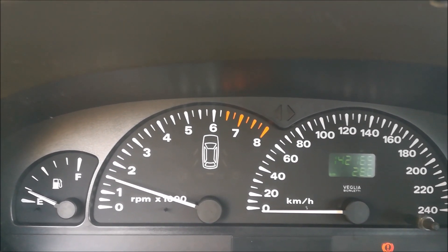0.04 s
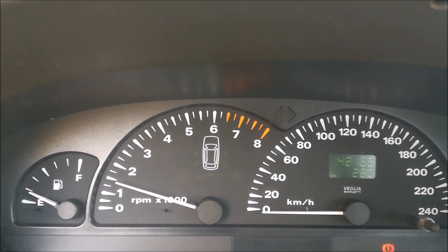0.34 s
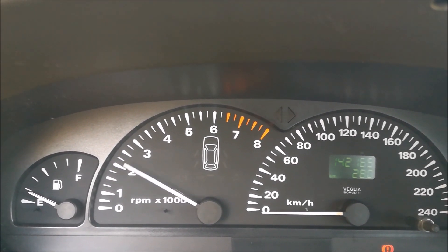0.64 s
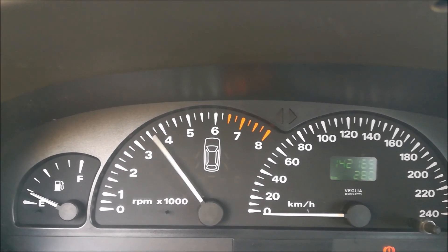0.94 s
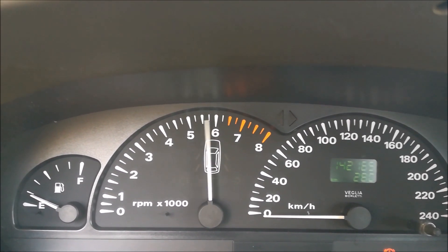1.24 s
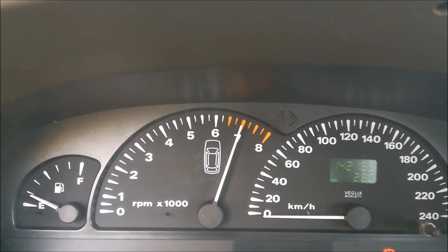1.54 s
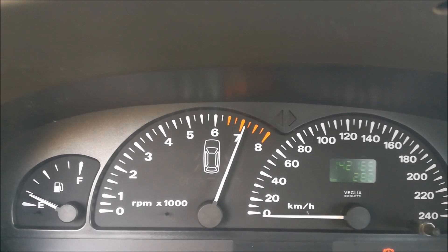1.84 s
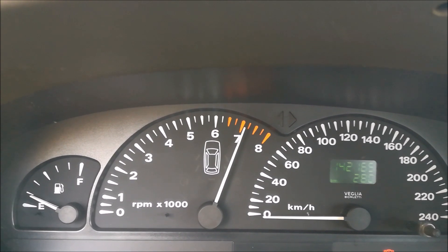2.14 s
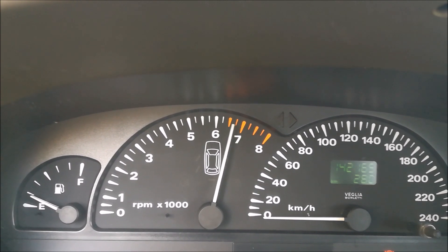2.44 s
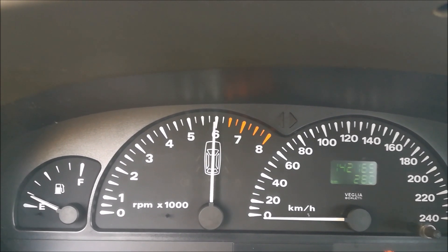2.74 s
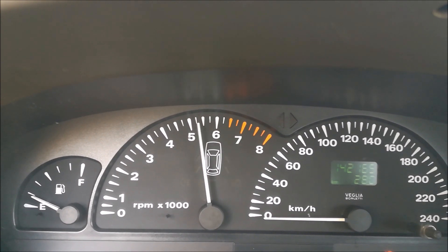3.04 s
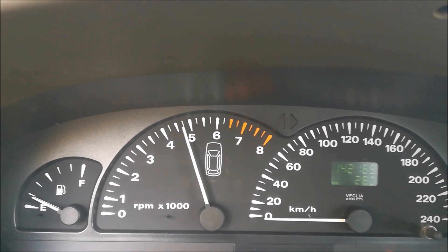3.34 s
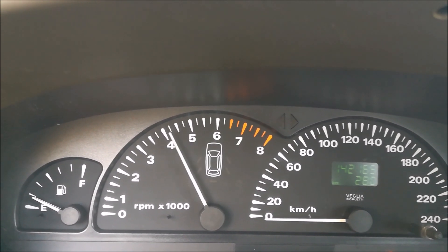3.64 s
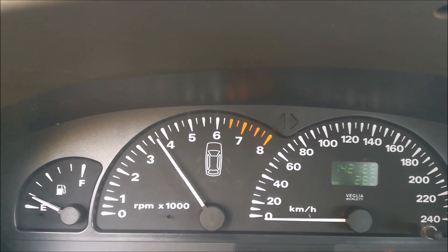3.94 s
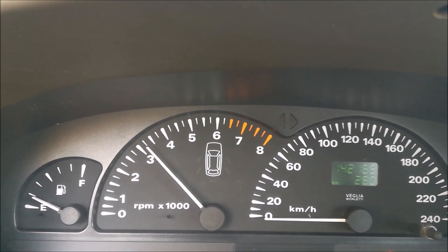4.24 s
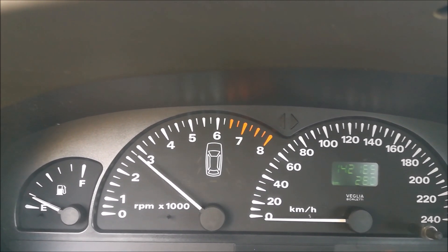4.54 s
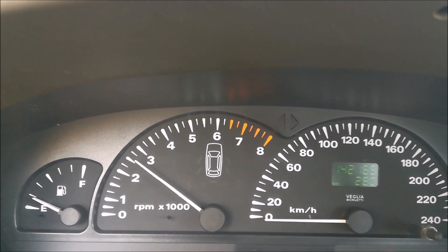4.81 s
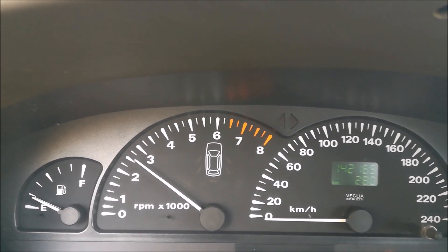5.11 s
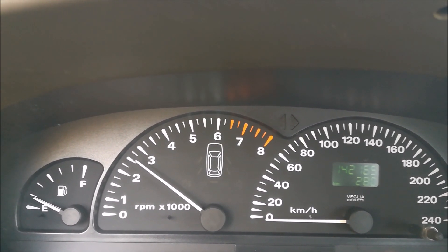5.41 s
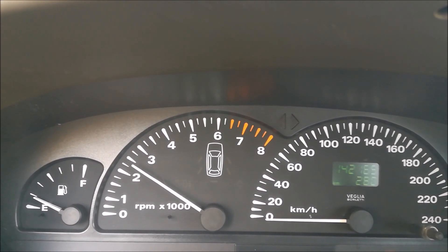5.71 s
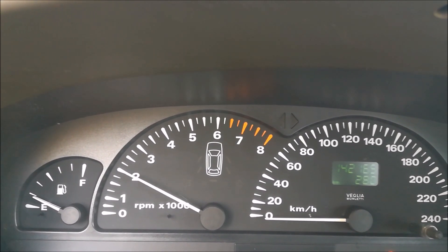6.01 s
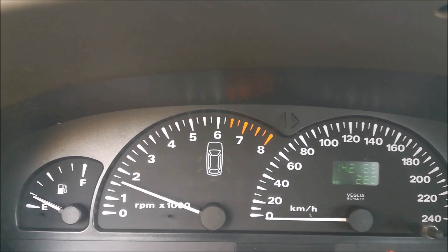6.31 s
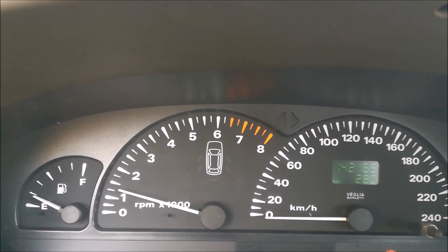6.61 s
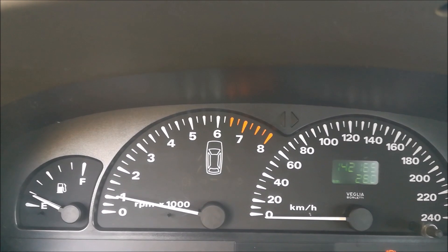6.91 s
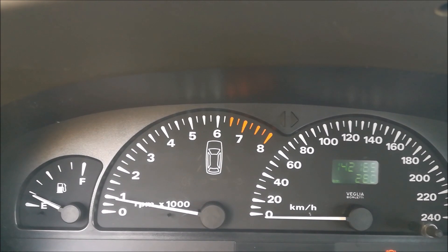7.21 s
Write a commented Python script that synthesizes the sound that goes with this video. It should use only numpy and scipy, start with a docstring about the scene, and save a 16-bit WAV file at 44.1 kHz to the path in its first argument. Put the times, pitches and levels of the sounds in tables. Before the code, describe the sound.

A parked car's engine revs hard, stutters against the limiter, then winds down to a quiet idle, heard from inside.

```python
"""Inside a parked car, stereo microphones at the driver's seat, the engine just beyond the bulkhead. The four-
cylinder is revved up to the limiter, which cuts in eight times a second; then it winds down, with one light
blip, to idle. Engine orders boom in the cabin over the rumble of the exhaust, and combustion and valve-train
noise come through the bulkhead. Far behind: intake, swells of rasp and faint squeaks."""
import sys
import numpy as np
from scipy import signal
from scipy.fft import rfft, irfft
from scipy.io import wavfile
from scipy.ndimage import uniform_filter1d

SR = 44100
rng = np.random.default_rng(int(sys.argv[2]) if len(sys.argv) > 2 else 0)


def log_audio(samples):
    """Write samples as a 16-bit WAV file to the path given in sys.argv[1]."""
    # one column per channel
    frames = np.atleast_2d(samples).T
    # limit to full scale, then quantise
    limited = np.clip(frames, -1, 1)
    pcm = np.round(limited * 32767).astype(np.int16)
    wavfile.write(sys.argv[1], SR, pcm)


N = 328986
TIME = np.arange(N) / SR
BINS = np.fft.rfftfreq(N, 1 / SR)
LIMIT_HZ, IDLE_HZ = 116.4, 17  # crank turns per second


# The engine's tones. Each row: multiple of crank speed, level at the limiter in dB with the throttle
# open, the same with it shut, off-throttle rise in dB per octave of speed.
ENGINE_ORDERS = [(.5, -22.5, -30, 22), (1, -24.5, -30.5, 4.5), (2, -19, -20, 5.5), (2.5, -23.5, -26, 5.5),
                 (3, -35, -32.5, 8.5), (3.5, -37.5, -38, 12), (4, -37.5, -36, 10), (4.5, -34.5, -39.5, 8.5),
                 (5, -34.5, -36, 6), (5.5, -30, -33.5, 13), (6, -33, -29, 18), (7, -32.5, -33, 16.5),
                 (7.5, -35, -34.5, 11), (10, -33, -32.5, 11.5), (12, -27, -35, 30)]
# A belt pulley, same columns.
PULLEY = [(1.15, -27, -22, 11)]
# Peaks and nodes on each order's way to the seat. Each row: order, centre in Hz, width in Hz, lift in dB.
PATHS = [(2, 194, 10, 4.5), (2, 174, 36, -9.6), (2, 136, 12, 2.6), (2, 55.2, 3, 7.4), (2, 36.8, 7.7, 11),
         (2.5, 187, 10, 4.5), (2.5, 284, 23, -7), (3, 216, 17, 10.5), (3, 288, 24, 11.5),
         (3, 341, 24, 13.5), (4, 432, 55, 14.5), (4, 135, 18, 8), (4, 67.5, 25, 16), (5, 293, 22, 10),
         (5, 424, 36, 12.5), (5, 548, 30, 14.5), (5, 210, 45, 5), (6, 545, 42, 12), (7, 401, 22, 11),
         (7, 290, 34, 13.5), (7.5, 475, 23, 10), (10, 1050, 40, 15), (12, 1100, 150, 15.5)]

def engine_tones(turns, speed, throttle, stutter_db, load_db_per_octave=4):
    """Orders swell and fade through the cabin modes; all but the firing tone stutter at the limiter."""
    out = np.zeros((2, N))
    octaves = np.log2(speed / LIMIT_HZ)
    burble = np.sqrt(LIMIT_HZ / speed)  # a slow engine runs less evenly
    for order, open_db, shut_db, slope in ENGINE_ORDERS + PULLEY:
        pitch = order * speed
        gain, lead = cabin(pitch)
        db = shut_db + throttle * (open_db - shut_db)
        db += (slope - load_db_per_octave * throttle) * octaves  # under load, loud even at low speed
        db += sum(lift * peak(pitch, hz, width) for k, hz, width, lift in PATHS if k == order)
        if order == 2:  # the firing tone
            rough = .08
        else:
            rough = .14 * np.sqrt(order) * (1 + throttle) / 2
            db += stutter_db
        out += gain * amp(db) * order_tone(order * turns, lead, rough * burble)
    return out


def order_tone(turns, lead, rough):
    """One order at the two microphones; unequal firings shake its strength and phase."""
    angle = 2 * np.pi * ((turns + rng.random()) % 1)
    phase = np.array([angle + lead / 2, angle - lead / 2])
    shaken = (1 + rough * wander(26)) * np.cos(phase) + rough * wander(11.6) * np.sin(phase)
    return shaken * np.sqrt(2 / (1 + 2 * rough ** 2))


# The rev, up and down. Each row: time in seconds, crank turns per second.
SPEED = [(0.0, 28.5), (0.14, 29.3), (0.32, 37.3), (0.4, 38.5), (0.55, 50.5), (0.81, 72.3), (1.08, 99.2),
         (1.31, 116.9), (2.06, 116.4), (2.87, 87.6), (3.78, 59.2), (4.43, 42), (4.68, 41.5), (4.98, 46.6),
         (5.3, 41.8), (5.92, 29.1), (6.05, 28.6), (6.67, 21.0), (7.0, 18.0), (7.46, 16.1)]
# The pedal: floored, lifted, one light blip. Each row: time in seconds, opening from 0 to 1.
THROTTLE = [(.1, 0), (.35, 1), (2.09, 1), (2.19, 0.3), (4.6, 0), (4.9, 0.13), (5.5, 0)]

def rev(surge, sag=.0043, jitter=.0015):
    """Crank speed and throttle: the flywheel coasts exponentially, sags at each cut and wavers."""
    glide = np.exp(curve([(s, np.log(hz)) for s, hz in SPEED]))
    smooth = uniform_filter1d(glide, size=SR // 14)
    return smooth * (1 - sag * surge + jitter * wander(12)), curve(THROTTLE)


# The limiter's fuel cuts. Each row: time in seconds, relative strength of the surge.
FUEL_CUTS = [(1.3, -1), (1.385, 2), (1.486, 4.5), (1.615, 2.5), (1.739, 4), (1.858, 4.5), (1.977, 3),
             (2.093, 1)]

def limiter(width_s, early_s=0):
    """Each cut jolts the engine: a brief surge about a steady mean."""
    surge = sum(size * np.exp(-((TIME + early_s - s) / width_s) ** 2) for s, size in FUEL_CUTS)
    return surge - uniform_filter1d(surge, size=SR // 4)


# The exhaust, from inside the car. Each row: frequency in Hz, relative level in dB.
RUMBLE_COLOUR = [(12, -30), (29, -7.5), (44, -10.5), (56, -1.5), (66, -11), (85, -17), (130, -20),
                 (300, -66.5)]
# Its course through the rev. Each row: time in seconds, level in dB before the trim.
RUMBLE_LEVEL = [(0.05, -40), (0.5, -39), (0.9, -33.5), (1.35, -23), (2.0, -25), (2.75, -25.5), (3.15, -42),
                (3.65, -37), (4.4, -29), (4.95, -30.5), (5.6, -28), (6.1, -27), (6.35, -33.5), (7.44, -37)]

def exhaust_rumble(jolt, trim_db=-1.5):
    """Deep exhaust noise that lurches with the limiter."""
    return amp(curve(RUMBLE_LEVEL) + trim_db + jolt) * noise(RUMBLE_COLOUR)


# The drone around the seat. Each row: frequency in Hz, relative level in dB.
DRONE_COLOUR = [(70, -22), (135, 2), (200, 0), (290, -2), (400, -8), (600, -8), (710, -21), (1200, -38)]
# Its loudness. In order: dB at the limiter and dB per octave of speed with the throttle open,
# the same two with it shut, dB at idle.
DRONE_LAW = (-24.5, 4, -28.5, 10.5, -50.5)

def gas_drone(speed, throttle, lump_db=.8, modal_share=.17):
    """Gas flow stirs the cabin modes into a slightly lumpy drone."""
    db = loudness(DRONE_LAW, speed, throttle) + lump_db * wander(12)
    cabin_gain, _ = cabin(BINS)
    return amp(db) * noise(DRONE_COLOUR, modal_share * 20 * np.log10(cabin_gain))


# Combustion, from behind the bulkhead. Each row: frequency in Hz, relative level in dB.
ROAR_COLOUR = [(350, -2.5), (720, -4.5), (960, -0.5), (1400, -3.5), (1800, -6), (2200, -11.5), (2700, -6),
               (5000, -17), (9000, -51)]
# Its loudness, laid out like DRONE_LAW.
ROAR_LAW = (-26.5, 15, -30, 17, -56.5)

def combustion(firings, turns, speed, throttle, surge, growl_db=-7):
    """The firings clatter and roar over a growl that gains with speed."""
    roar = clatter(firings, turns, ROAR_COLOUR, knock_share=.18, throb=.01)
    roar += amp(growl_db) * np.sqrt(speed / LIMIT_HZ) * growl(turns)
    return amp(loudness(ROAR_LAW, speed, throttle) + .35 * surge) * roar


def growl(turns, size=2048, half_orders=48):
    """The part of the combustion noise that repeats every two turns: a dense comb of half orders."""
    comb = np.exp(2j * np.pi * rng.random((2, half_orders)))
    comb[:, :half_orders // 4] = 0
    place = np.arange(size) / size
    cycles = np.array([np.interp(turns / 2 % 1, place, cycle) for cycle in irfft(comb, size)])
    return unit(irfft(rfft(cycles) * amp(spectrum(ROAR_COLOUR, BINS)), N))


# The valve train, from behind the bulkhead. Each row: frequency in Hz, relative level in dB.
VALVE_COLOUR = [(1800, -19), (3200, -5.5), (4200, -6.5), (6200, -6), (7500, -4), (9200, -7.5),
                (10400, -11.5), (12000, -10.5), (15500, -22)]
# Its loudness, laid out like DRONE_LAW.
VALVE_LAW = (-31.5, 17, -38.5, 15.5, -65)

def valve_train(taps, turns, speed, throttle, surge):
    """Valves tap and hiss, surging at the fuel cuts."""
    db = loudness(VALVE_LAW, speed, throttle) + 1.02 * surge
    return amp(db) * clatter(taps, turns, VALVE_COLOUR, knock_share=.22, throb=.039)


def knocks(turns, per_turn, uneven_db, chance_db, scatter_s=.0003):
    """A train of blows; their pattern repeats every two turns, with chance in strength and timing."""
    beat = np.floor(turns * per_turn).astype(int)
    at = np.flatnonzero(np.diff(beat)) + 1
    pattern = rng.uniform(-.5, .44, 2 * per_turn)
    chance, late = rng.uniform(-2, 2, (N, 2))[beat[at]].T
    landing = (at + np.round(late * scatter_s * SR).astype(int)) % N
    train = np.zeros(N)
    train[landing] = amp(uneven_db * pattern[beat[at] % len(pattern)] + chance_db * chance)
    return train


# Bulkhead panels ahead of the seat. Each row: centre in Hz, width in Hz, full lift in dB.
PANELS = [(1010, 90, 5.5), (1380, 90, 4.5), (1743, 55, 8), (2190, 240, 13.5)]

def clatter(train, turns, colour, knock_share, throb, idle_ring=.48):
    """Blows and rushing noise that pulses with each firing, both through the bulkhead panels."""
    blows = irfft(rfft(train) * amp(spectrum(colour, BINS)), N)
    blows = unit(reflect(np.array([blows, blows]), t60=.092, wet_db=5))
    rush = unit(noise(colour) * firing_pulse(turns, throb))
    plain = np.sqrt(knock_share) * blows + np.sqrt(1 - knock_share) * rush
    panels_db = sum(db * peak(BINS, hz, width) for hz, width, db in PANELS)
    ringing = irfft(rfft(plain) * (amp(panels_db) - 1), N)
    # the panels ring more as the engine shakes them faster
    pace = np.gradient(turns)
    shaking = np.interp(pace, [pace.min(), pace.max() / 2], [idle_ring, 1])
    return unit(plain + shaking * ringing)


def shudder(turns, speed, mount_hz=30.5, peak_db=-37, rest_db=-52):
    """Uneven firings rock the block and thud through the body, hardest where the mounts resonate."""
    blows = knocks(turns, per_turn=2, uneven_db=3.5, chance_db=4.5)
    thuds = unit(band(blows, hz=198, width=123))
    return amp(rest_db + (peak_db - rest_db) * peak(speed, mount_hz, width=15)) * thuds


def intake(turns, speed, throttle, limit_db=-37, db_per_octave=9):
    """Air rasps past the open throttle, one gulp for each cylinder."""
    gulps = rng.standard_normal((2, N)) * firing_pulse(turns, depth=.5)
    rasp = unit(band(gulps, hz=1150, width=800))
    return throttle * amp(limit_db + db_per_octave * np.log2(speed / LIMIT_HZ)) * rasp


# A low cabin boom as the revs climb, the short low knock under the tick, a soft thump as the engine slows.
# Each row: start in seconds, level in dB, pitch in Hz, seconds to fall 60 dB.
LOW_SOUNDS = [(0.455, -3, 108, 0.42), (4.875, -13, 130, 0.025), (5.945, -19, 180, 0.05)]

def boom_and_knocks():
    """Each is a low tone that rises softly and dies away."""
    out = np.zeros(N)
    for start, db, hz, t60 in LOW_SOUNDS:
        age = np.maximum(TIME - start, 0)
        attack = 1 - np.exp(-10 * age / t60)
        out += amp(db - 60 * age / t60) * attack * np.sin(2 * np.pi * hz * age)
    return out


# Swells of narrow rasp. # Each row: midpoint in seconds, length in seconds, centre in Hz, width in Hz, level in
# dB.
RASP_SWELLS = [(0.357, 1, 980, 200, -56.5), (4.48, 0.27, 1090, 160, -54), (5.05, .6, 1220, 350, -61),
               (7.26, 0.42, 2950, 450, -66)]

def rasp_swells(turns):
    """Swells of narrow rasp that pulse with each firing."""
    out, pulse = np.zeros((2, N)), firing_pulse(turns, depth=.5)
    for middle, length, hz, width, db in RASP_SWELLS:
        swell = np.cos(np.pi * np.clip((TIME - middle) / length, -.5, .5))
        out += amp(db) * swell * unit(pulse * band(rng.standard_normal((2, N)), hz, width))
    return out


# Squeaks that barely reach the seat.
# Each row: midpoint in seconds, length in seconds, top pitch in Hz, level in dB.
SQUEAKS = [(6.048, .04, 9720, -65), (6.126, .03, 9720, -61), (6.43, .03, 5520, -63),
           (6.465, .04, 4000, -65), (6.49, .04, 4750, -66), (6.522, .07, 2800, -62.5),
           (6.555, .05, 4750, -62.5)]

def squeaks(arch=.016, quiver_hz=35, flutter=.45):
    """Faint broken squeaks that arch in pitch."""
    out, quiver = np.zeros(N), quiver_hz * wander(158)
    grip = np.maximum(1 + flutter * wander(70), 0)
    for middle, length, hz, db in SQUEAKS:
        near = abs(TIME - middle) < length / 2
        swell = np.cos(np.pi * (TIME[near] - middle) / length)
        pitch = hz * (1 + arch * (swell - 1)) + quiver[near]
        out[near] += amp(db) * swell * grip[near] * np.sin(2 * np.pi * np.cumsum(pitch) / SR)
    return out


# Thin hiss shared by the idle valve and the dashboard. Each row: frequency in Hz, relative level in dB.
AIR_COLOUR = [(1200, -36), (3500, 9), (7400, 9), (9500, -15), (15500, -19)]

def idle_air_and_tick(open_s=2.5, close_s=6.5, tick_s=4.875, tick_t60=.042):
    """The idle valve hisses as it catches the falling engine; plastic dashboard trim ticks once."""
    opening = np.minimum((TIME - open_s) / 7, (close_s - TIME) / 1.5)
    air = amp(-54) * np.clip(opening, 0, 1)
    tick = (TIME > tick_s) * amp(-49 - 60 * abs(TIME - tick_s) / tick_t60)
    return (air + tick) * noise(AIR_COLOUR)


# The cabin's air modes at the driver's seat.
# Each row: centre in Hz, width in Hz, gain in dB, lead of the left microphone in radians.
CABIN_MODES = [(53, 12, -2, 0.1), (107, 41, -6.5, 0.1), (145.5, 40, -2, 0.23), (206.3, 60, 1.5, 0.25),
               (233, 4.7, 3.5, -0.86), (294.1, 11.5, -0.5, -1), (331.3, 42, 1, -2), (381, 17, 1.5, -1.8),
               (421.2, 18, -1.5, -1.5), (502, 98, -1, -2)]

def cabin(hz, floor_db=-14):
    """Gain and left-right phase of a tone that sweeps through the cabin modes."""
    grid = np.geomspace(5, 4000, 1500)
    modes = sum(amp(db) ** 2 / (1 + 2 * ((grid - f) / width) ** 2) ** 2 for f, width, db, _ in CABIN_MODES)
    gain = np.interp(hz, grid, np.sqrt(amp(floor_db) ** 2 + modes))
    return gain, spectrum([(f, lead) for f, _, _, lead in CABIN_MODES], hz)


def reflect(x, t60, wet_db):
    """Short dense reflections from glass and trim comb each channel differently."""
    t = np.arange(SR // 8) / SR
    tail = rng.standard_normal((2, len(t))) * amp(-60 * t / t60)
    tail *= amp(wet_db) / np.linalg.norm(tail, axis=1, keepdims=True)
    return (x + signal.oaconvolve(x, tail, axes=1)[:, :N]) / np.sqrt(1 + amp(wet_db) ** 2)


# How alike the two microphones hear the cabin. Each row: frequency in Hz, correlation from -1 to 1.
LIKENESS = [(120, 1), (200, 0.78), (290, 0.65), (450, -0.16), (1500, 0.053), (15000, -0.18)]

def noise(colour, lift_db=0):
    """Two channels of coloured noise, alike in the bass and nearly unrelated in the treble."""
    left, other = rfft(rng.standard_normal((2, N)))
    same = spectrum(LIKENESS, BINS)
    right = same * left + np.sqrt(1 - same ** 2) * other
    return unit(irfft(np.array([left, right]) * amp(spectrum(colour, BINS) + lift_db), N))


def loudness(law, speed, throttle, idle_db_per_octave=5):
    """dB of a noise that grows with speed and throttle, over what remains of it at idle."""
    open_db, open_slope, shut_db, shut_slope, idle_db = law
    octaves = np.log2(speed / LIMIT_HZ)
    driven = throttle * (open_db + open_slope * octaves)
    driven += (1 - throttle) * (shut_db + shut_slope * octaves)
    idling = idle_db + idle_db_per_octave * np.log2(speed / IDLE_HZ)
    return 20 * np.log10(np.hypot(amp(driven), amp(idling)))


def firing_pulse(turns, depth):
    """A gain that swells twice a turn, once for each firing."""
    return 1 + depth * np.cos(4 * np.pi * turns)


def wander(rate):
    """Random drift of rms 1, changing about rate times a second."""
    s = np.arange(0, 8, .002)
    hz = np.fft.rfftfreq(len(s), s[1])
    slow = irfft(rfft(rng.standard_normal(len(s))) / (1 + (hz / rate) ** 4), len(s))
    return np.interp(TIME, s, unit(slow))


def peak(hz, centre, width):
    """A resonance curve of height 1."""
    return 1 / (1 + (2 * (hz - centre) / width) ** 2)


def band(x, hz, width):
    """Passes one broad resonance."""
    return irfft(rfft(x) / (1 + (2 * (BINS - hz) / width) ** 4), N)


def curve(rows):
    """A time table at every sample."""
    return np.interp(TIME, *np.transpose(rows))


def spectrum(rows, hz):
    """A frequency table read on a log axis."""
    f, value = np.transpose(rows)
    return np.interp(np.log(hz + 1), np.log(f + 1), value)


def amp(db):
    """Decibels to gain."""
    return 10 ** (np.asarray(db) / 20)


def unit(x):
    """Scales to rms 1."""
    return x / np.sqrt(np.mean(x ** 2) + 1e-20)


def scene():
    """The rev from the driver's seat: crank speed and throttle drive the engine's layers."""
    surge = limiter(width_s=.02)
    jolt = limiter(width_s=.028, early_s=.057)  # the block lurches just before it clatters
    speed, throttle = rev(surge)
    turns = np.cumsum(speed) / SR
    firings = knocks(turns, per_turn=2, uneven_db=-1, chance_db=6)
    valve_taps = knocks(turns, per_turn=4, uneven_db=.5, chance_db=4)
    out = engine_tones(turns, speed, throttle, stutter_db=.45 * jolt)
    out += exhaust_rumble(jolt) + gas_drone(speed, throttle)
    out += combustion(firings, turns, speed, throttle, surge)
    out += valve_train(valve_taps, turns, speed, throttle, surge)
    out += shudder(turns, speed) + rasp_swells(turns) + intake(turns, speed, throttle)
    return out + boom_and_knocks() + squeaks() + idle_air_and_tick()


def record(dry, hiss_db=-78, edge_hz=15750):
    """Microphone hiss, then the band limit."""
    heard = dry + amp(hiss_db) * rng.standard_normal((2, N))
    return irfft(rfft(heard) * np.clip((edge_hz - BINS) / 200 + .5, 0, 1), N)


dry = scene()
out = record(dry)
log_audio(out)
```